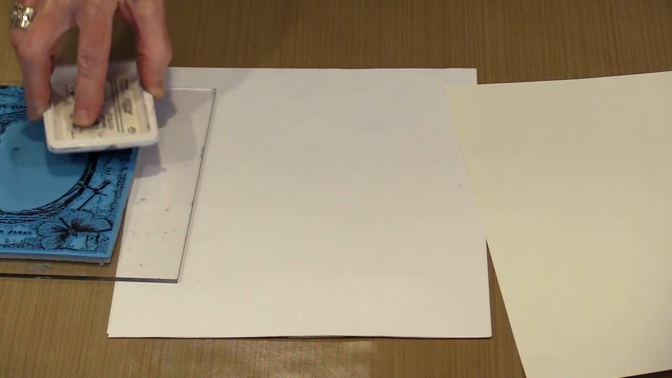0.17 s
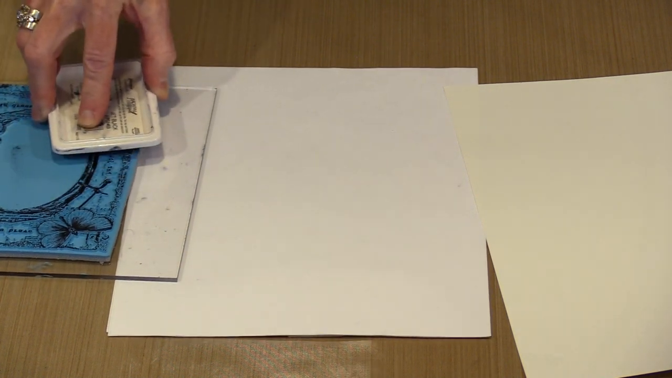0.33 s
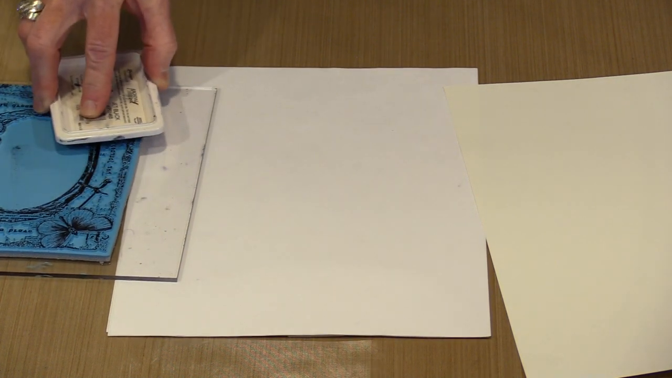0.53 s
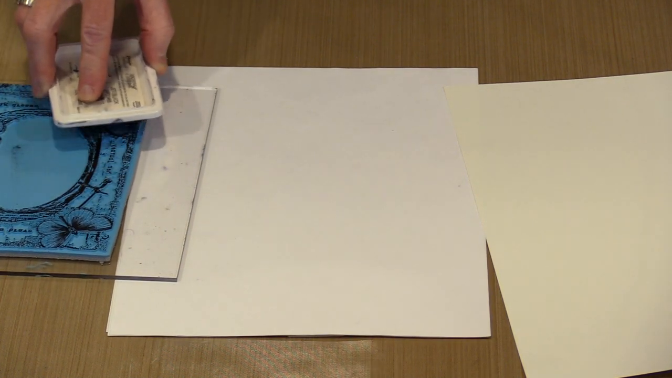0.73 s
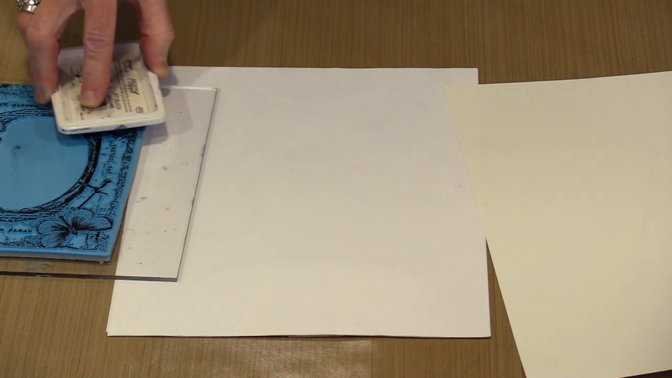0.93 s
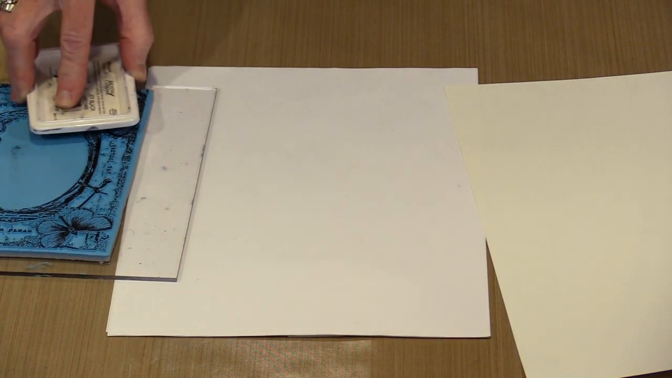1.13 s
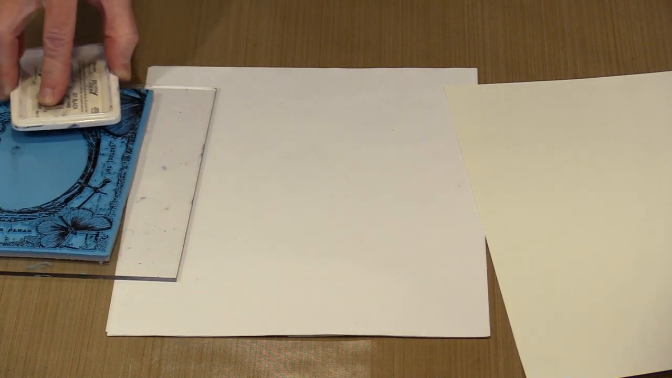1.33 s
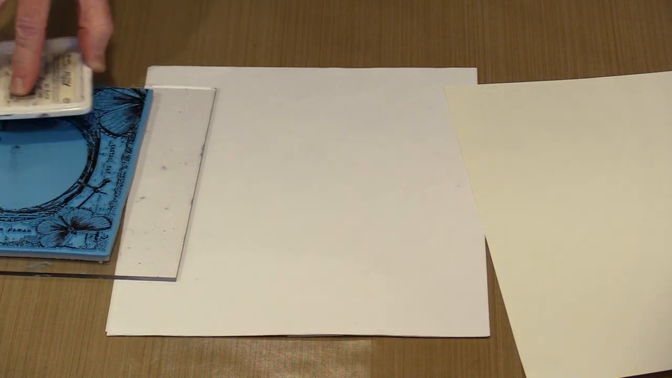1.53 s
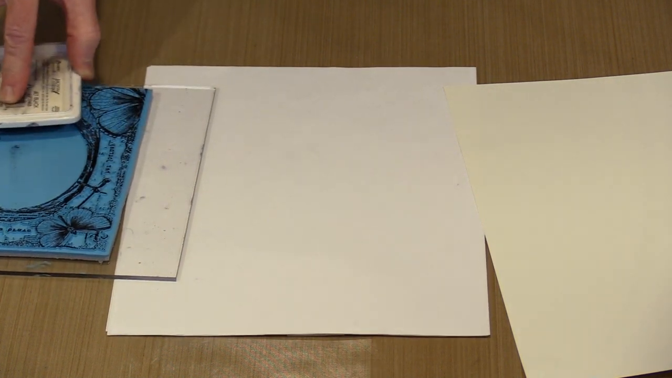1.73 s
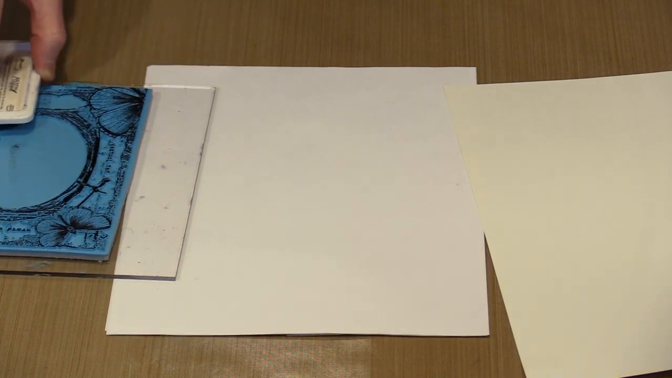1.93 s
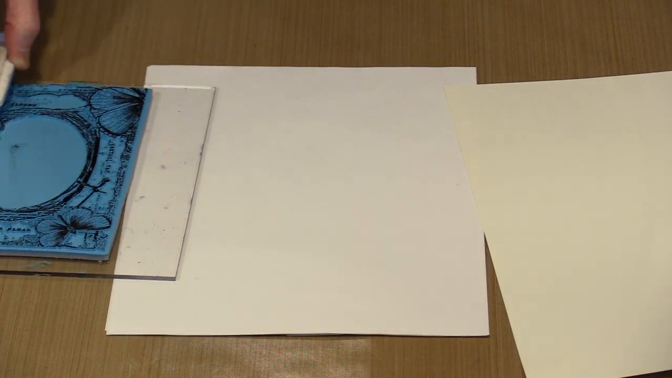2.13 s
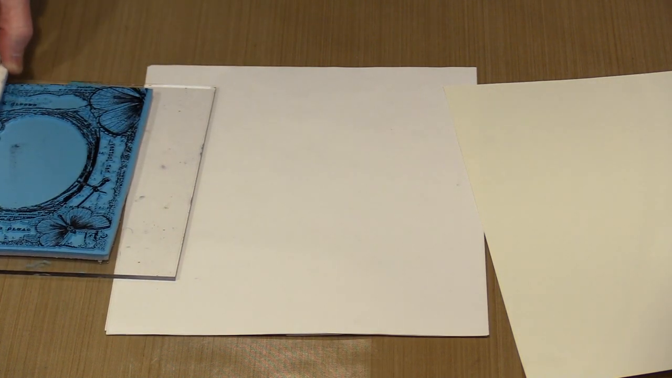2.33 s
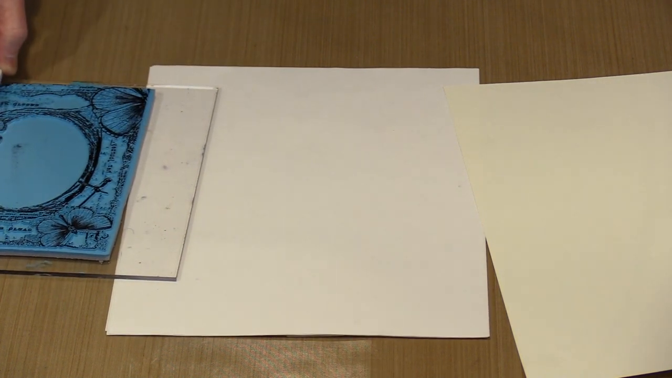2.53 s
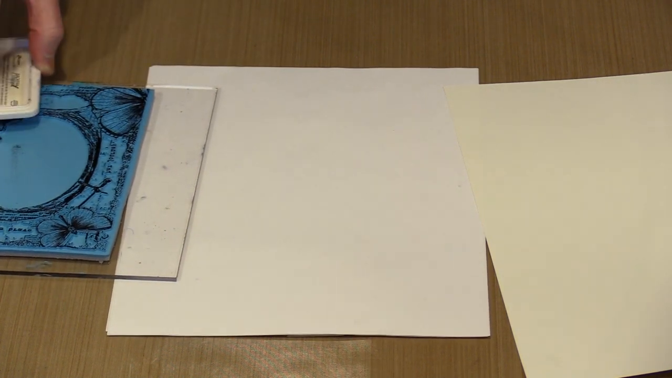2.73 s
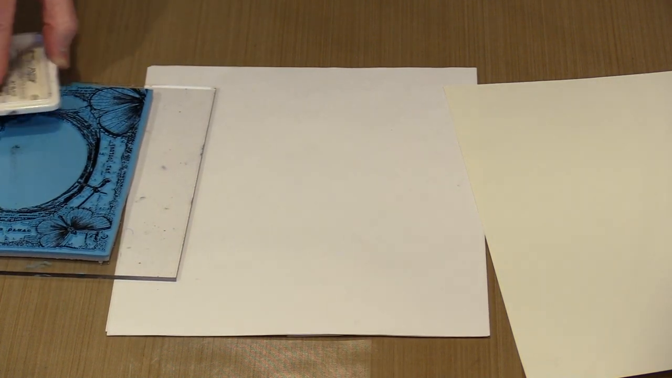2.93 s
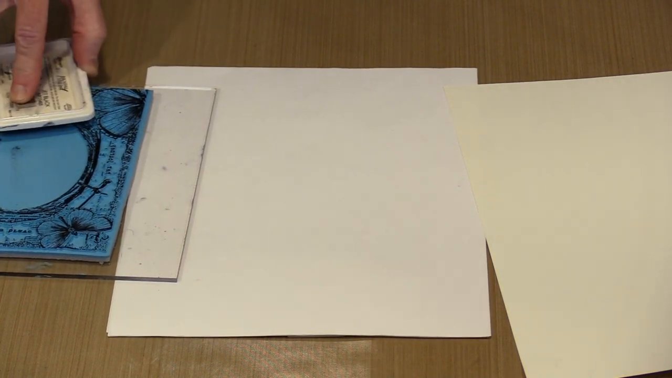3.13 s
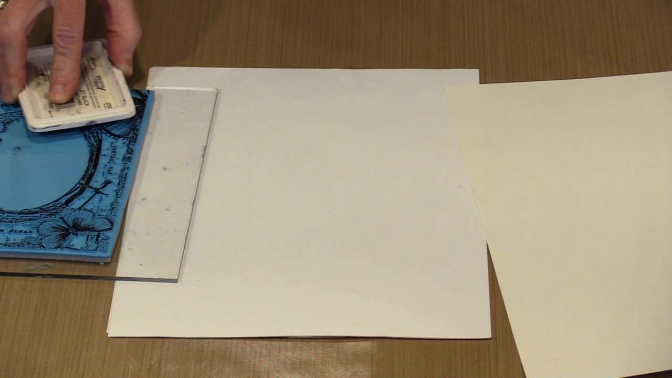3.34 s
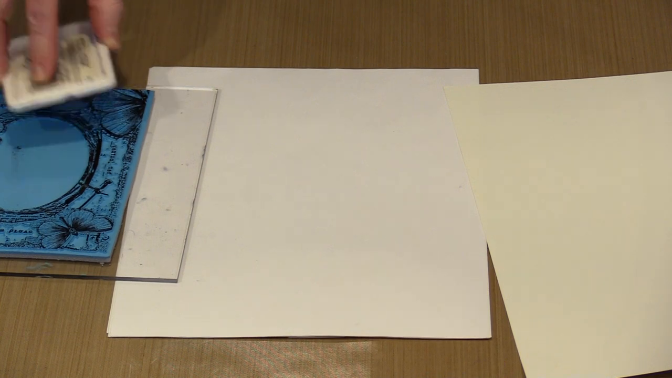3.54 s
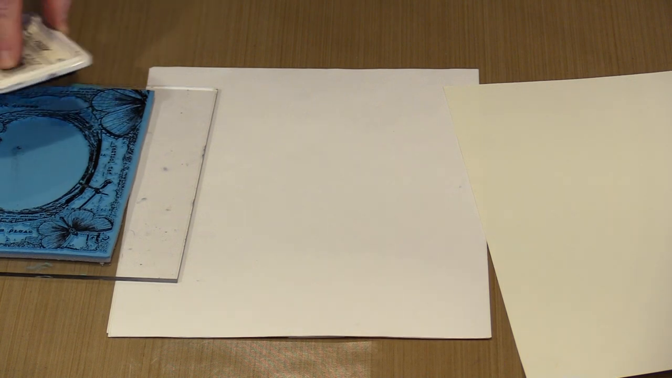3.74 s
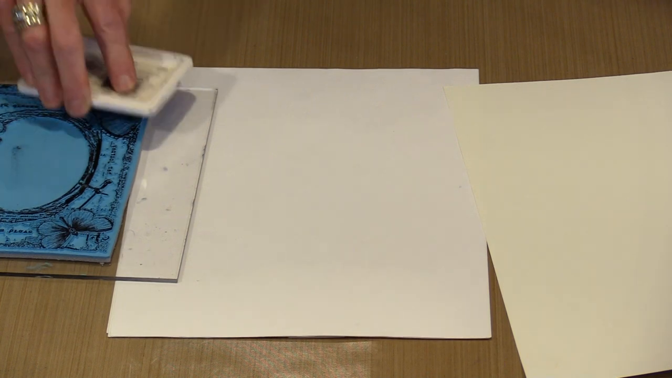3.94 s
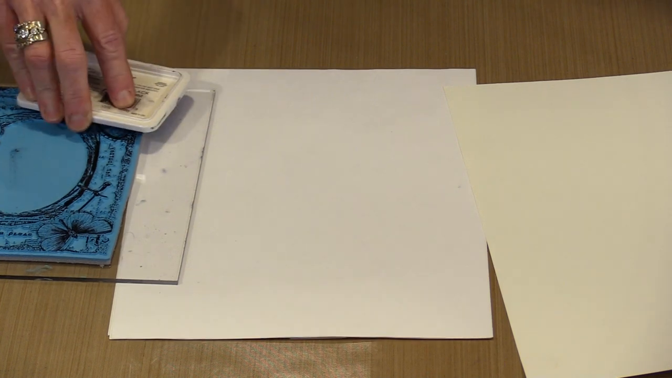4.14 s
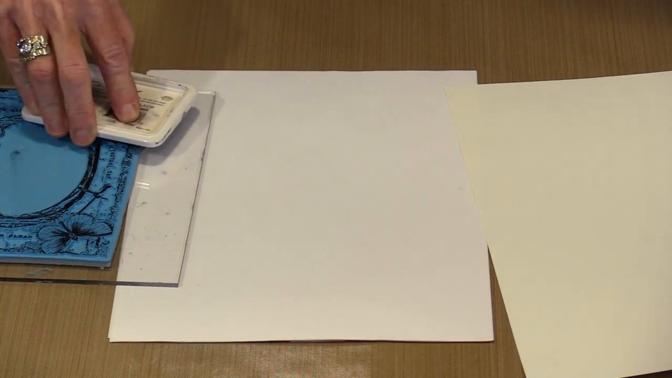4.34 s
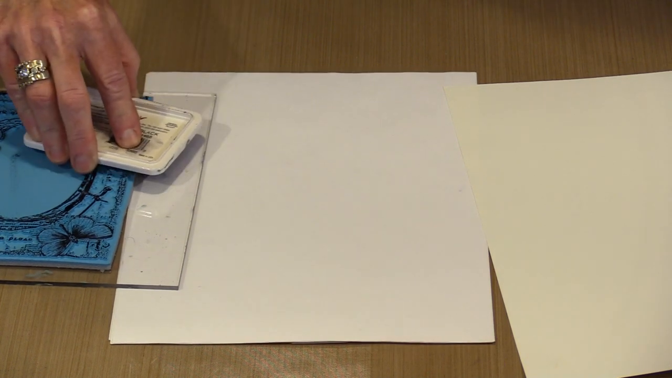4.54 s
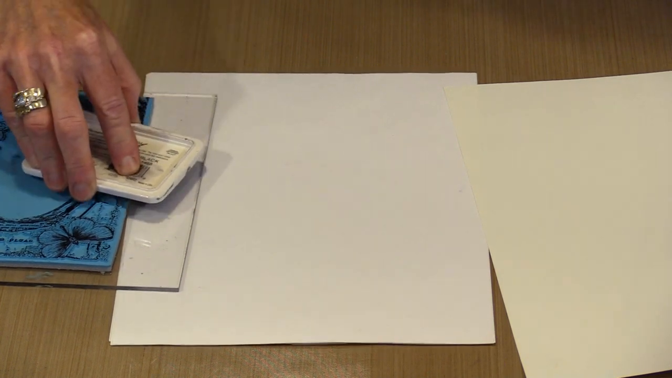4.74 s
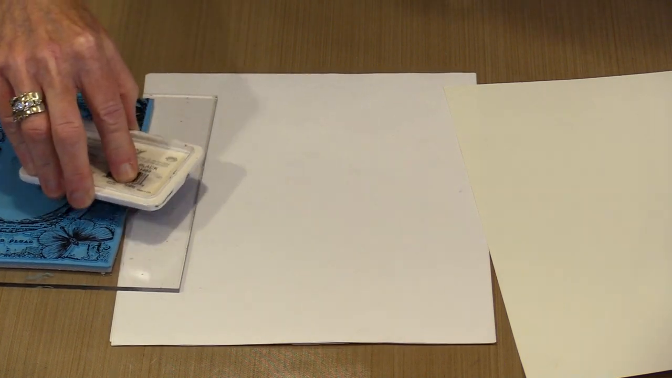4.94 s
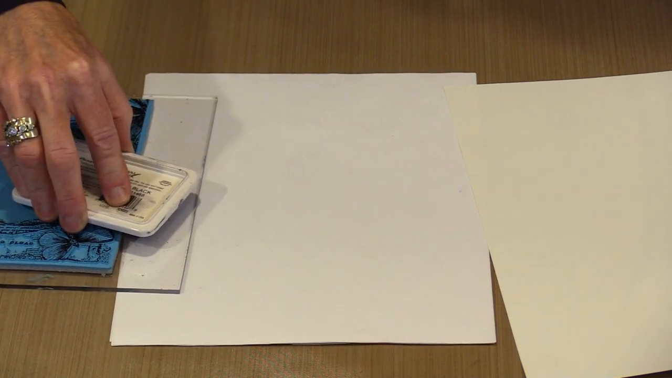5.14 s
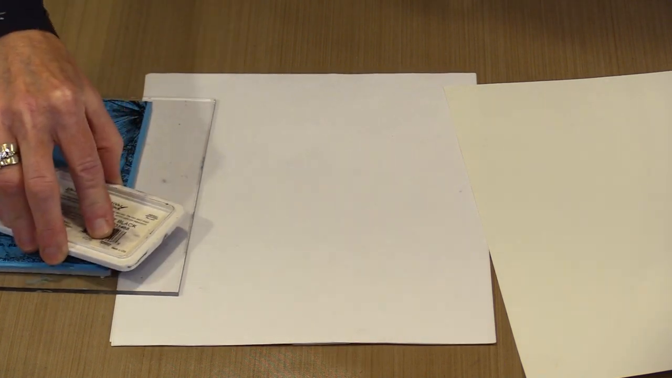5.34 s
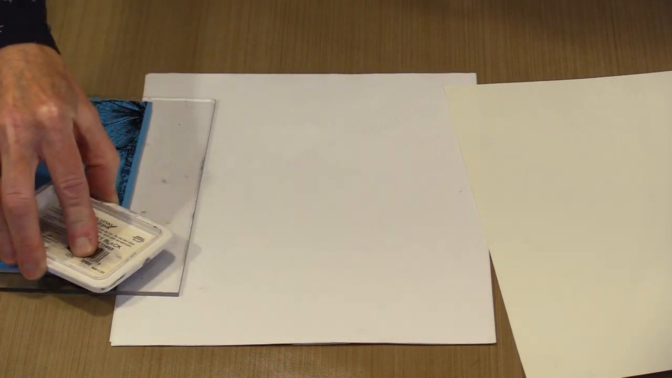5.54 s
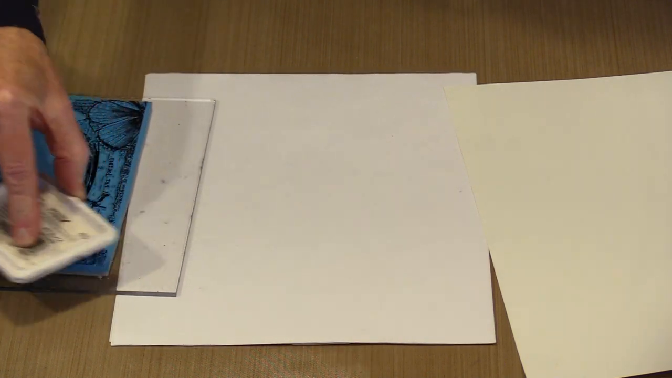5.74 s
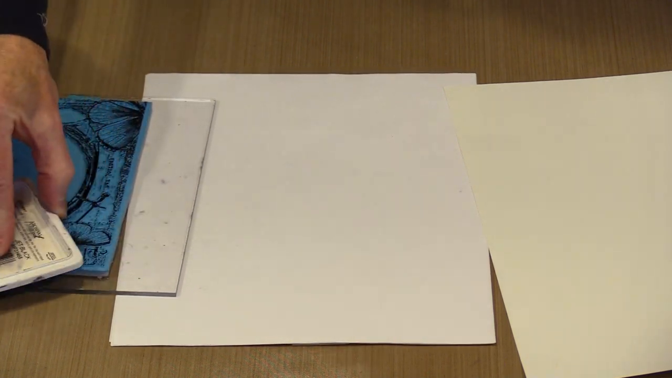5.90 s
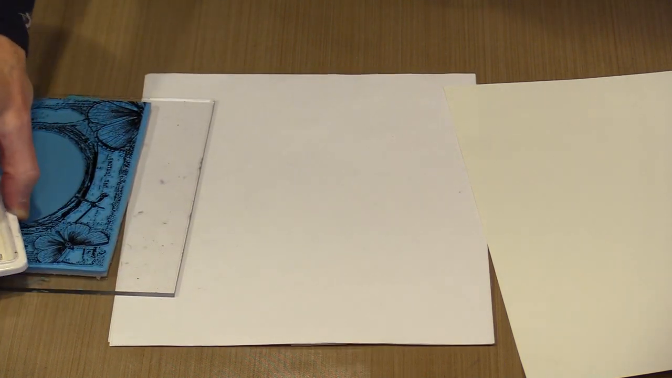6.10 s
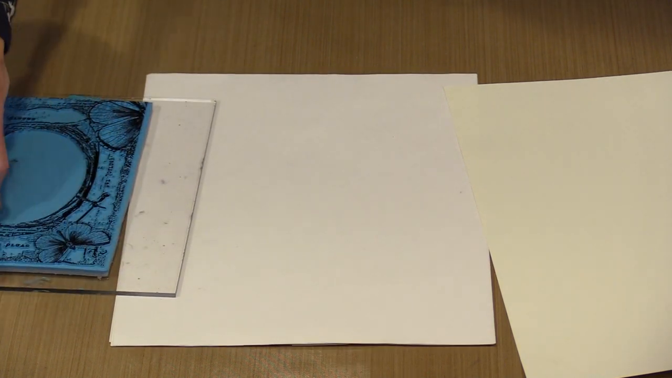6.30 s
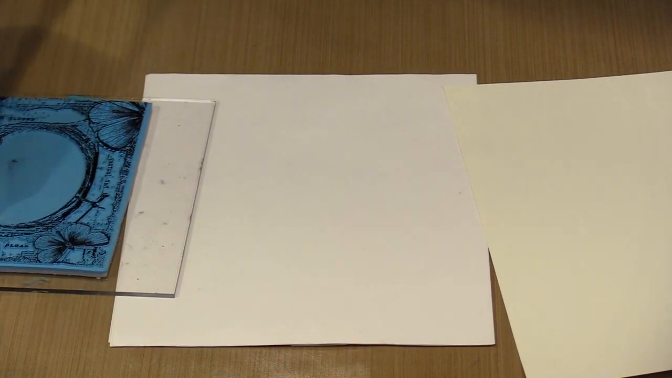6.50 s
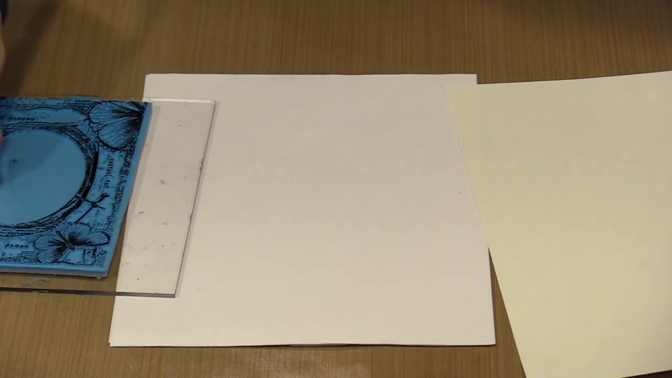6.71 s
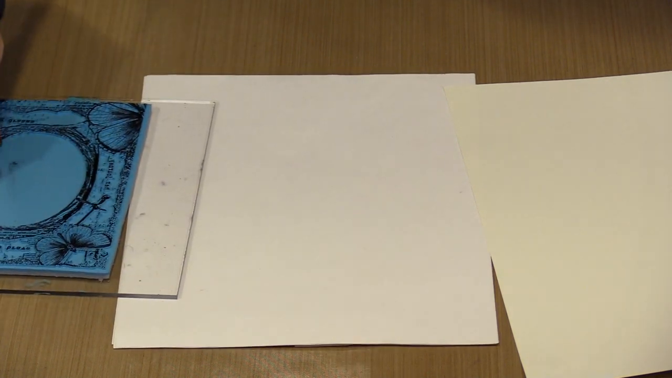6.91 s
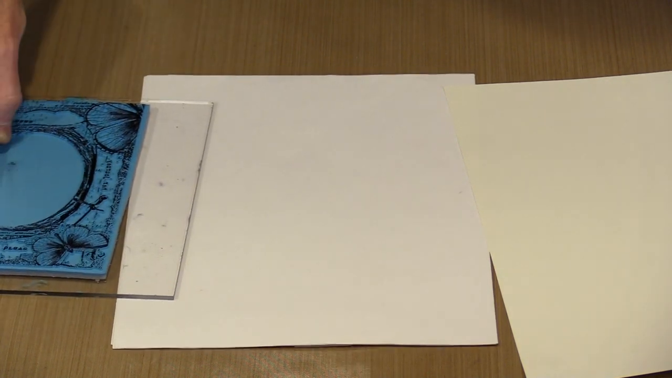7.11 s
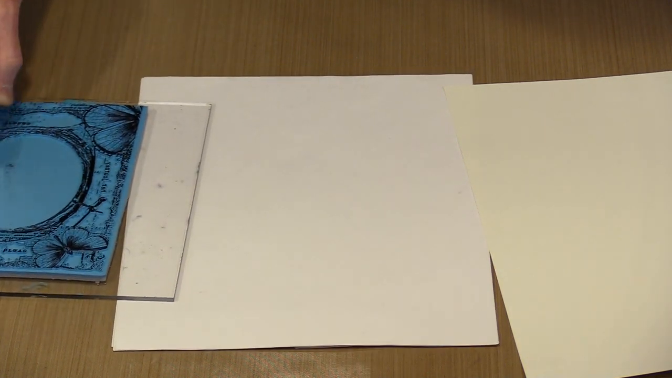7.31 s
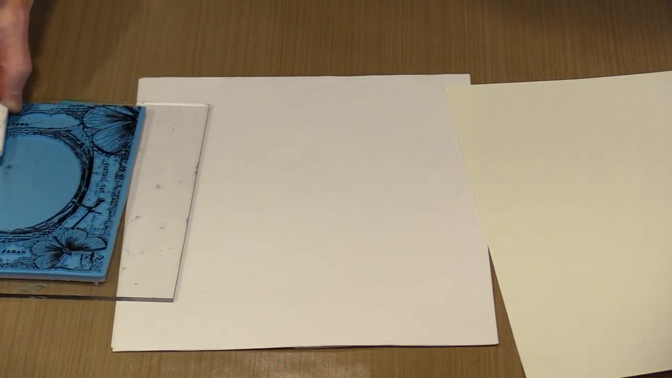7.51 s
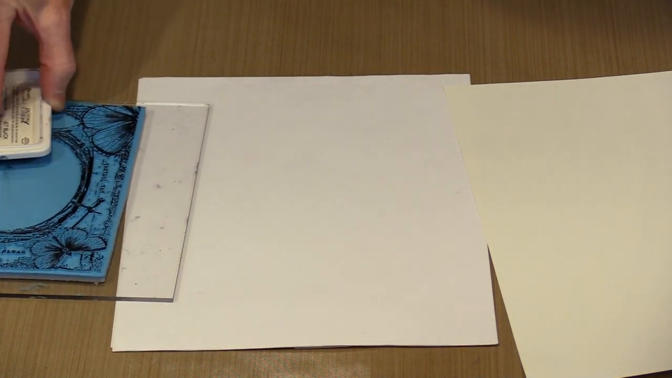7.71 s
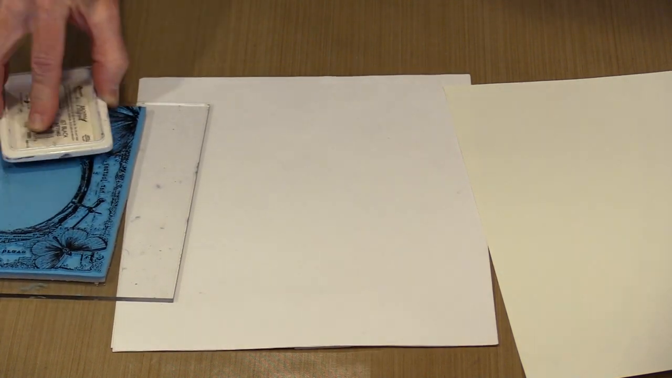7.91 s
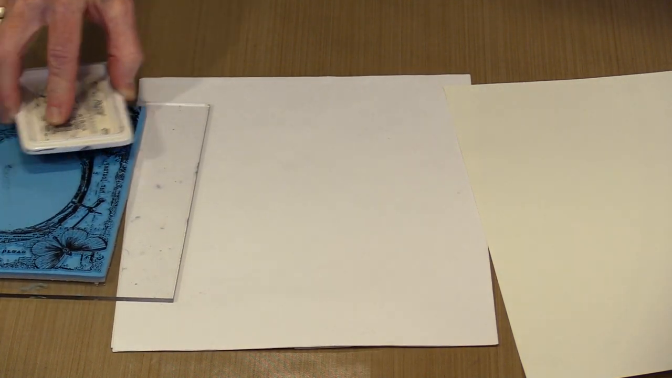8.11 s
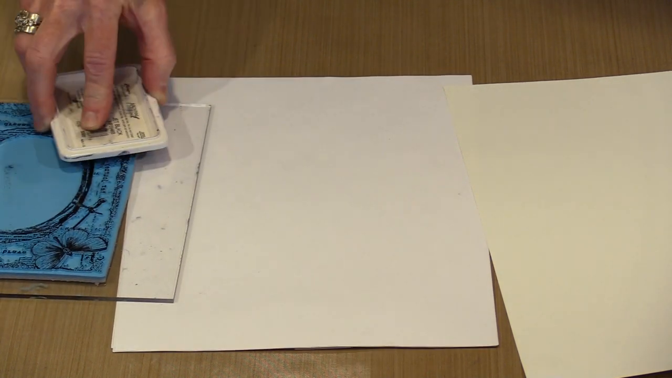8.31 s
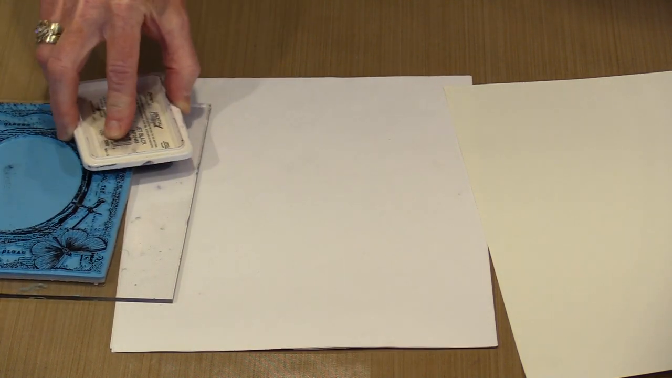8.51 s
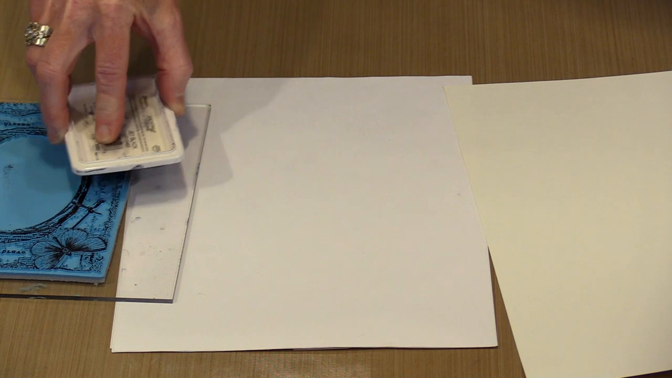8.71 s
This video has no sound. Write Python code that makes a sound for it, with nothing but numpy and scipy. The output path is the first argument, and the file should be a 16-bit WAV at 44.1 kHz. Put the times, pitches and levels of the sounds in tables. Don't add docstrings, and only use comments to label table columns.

```python
import sys
import numpy as np
from scipy import signal
from scipy.fft import rfft, irfft
from scipy.io import wavfile
from scipy.ndimage import uniform_filter1d

SR = 44100
rng = np.random.default_rng(int(sys.argv[2]) if len(sys.argv) > 2 else 0)


def how_loud(loudness_db):
    steps = np.asarray(loudness_db, float) / 20
    return 10 ** steps


def log_audio(samples):
    frames = np.atleast_2d(samples).T
    limited = np.clip(frames, -1, 1)
    pcm = np.round(limited * 32767).astype(np.int16)
    wavfile.write(sys.argv[1], SR, pcm)


N = 386139

# [f/Hz, level per Hz/dB]
AIR = [(18, -59), (30, -10), (109, -9.5), (239, -6.5), (265, -6.5), (987, -10), (1100, -9), (1390, -13),
       (8500, -26), (16000, -37)]
# [f/Hz, width/Hz, level/dB]
FAN = [(122, 40, 5.5), (218, 13, 4), (1115, 105, 3.5), (1695, 13, 6)]
# [f/Hz, correlation]
LIKENESS = [(60, 0.66), (150, 0.73), (380, 0.027), (950, -0.49), (2380, 0.37), (5980, 0.68), (15000, 0.62)]
# [f/Hz, t60/s]
ROOM_DECAY = [(60, 0.6), (350, 0.25), (1000, .3), (2500, 0.29), (6400, 0.21), (14000, 0.059)]
# [f/Hz, level/dB]
ROOM_LEVEL = [(60, -23.5), (250, 0), (500, -15), (1200, -14.5), (3000, -12), (8000, -10)]
# [delay/s, left gain, right gain]
ECHOES = [(.0045, -0.13, 0.4), (.0092, 0.26, 0.084), (0.0145, 0.13, 0.08), (.0165, -0.11, -0.016),
          (.021, 0.038, -0.065)]
# [t/s, level/dB, f/Hz, width/Hz, spread/s]
SNAPS = [(1.868, -23.5, 4850, 920, 0.0023), (1.872, -30.5, 9300, 7750, .002), (1.888, -35, 520, 196, 0.017),
         (1.992, -34.5, 3170, 1500, .002), (2.055, -37, 3180, 910, 0.0031), (2.412, -34, 2930, 1200, .002),
         (3.823, -32, 7300, 5000, 0.0021)]
# [t/s, level/dB, f/Hz, width/Hz, spread/s]
RATTLE = [(6.386, -24, 3000, 1800, 0.015), (2.815, -24, 3200, 2600, 0.02)]
# [t/s, level/dB]
CLACK = [(2.808, -1)]
# [f/Hz, level/dB, t60/s]
CLACK_RING = [(504, -9, 0.17), (612, -2.5, 0.1), (1080, -16.5, 0.49), (1484, 7, 0.035), (1695, 0, 0.24),
              (2235, 2, 0.18), (2350, 13.5, 0.013), (2670, 4.5, 0.052), (3230, 7, 0.025), (3670, -11, 0.11),
              (4200, 7, 0.0039), (4760, 3.5, 0.0089), (7100, -1, 0.012), (9040, -0.5, 0.0095)]
# [t/s, level/dB]
KNOCK = [(2.956, -16.5)]
# [f/Hz, level/dB, t60/s]
KNOCK_RING = [(566, -9.5, 0.21), (715, -14, .03), (830, -5, 0.028), (940, 4.5, 0.038), (1190, -3, .03),
              (1630, -8, 0.017), (2660, -14, 0.02), (3400, -18, .01)]
# [f/Hz, level/dB, t60/s]
TABLE = [(62.5, -2.5, 0.2), (84.3, 3.5, 0.15)]
# [f/Hz, level/dB, t60/s]
BOARD = [(168.5, 1, 0.12), (222.6, -3, 0.12), (146, -14.5, 0.14)]
# [f/Hz, level/dB, t60/s]
PANEL = [(294.5, 4.5, 0.056), (324.5, -1, 0.24), (364, 1.5, 0.25), (415, 3, 0.094), (470, -10, 0.19),
         (562, 1, 0.085), (614, -1.5, 0.097), (715, -6.5, 0.07)]
# [f/Hz, level/dB]
LID = [(680, -6.5), (800, 2), (960, -3)]
# [f/Hz, level/dB]
WALL = [(1150, -20), (1270, 7), (1420, 8.5), (1560, 2.5), (1850, 1)]
# [f/Hz, level/dB]
EDGE = [(2120, 8.5), (2520, 10.5), (2900, 7.5), (3250, 9.5), (3800, 6.5), (4500, 3), (5300, -6),
        (6500, -19), (8500, -36)]
# [t/s, weight/dB, board/dB]
WEIGHT = [(0, -31.5, 7.5), (.45, -26.5, -10), (1.101, -29, 0.5), (1.6, -29, -1.5), (2.4, -40, 4.5),
          (3.052, -28, -4.5), (3.998, -25.5, 0.5), (4.8, -29, -0.5), (5.3, -26.5, 4), (5.601, -33.5, 1.5),
          (6.13, -27.5, 5), (6.401, -33, 8.5), (6.77, -34.5, -7), (7.552, -28, 8.5), (8.1, -31.5, -4),
          (8.6, -26, 3.5)]
# [t/s, slab pop level/dB, pop f/Hz, case slap level/dB, edge-first tilt/dB]
DABS = [(0.012, -7, 520, -23, -17), (0.278, -2.5, 515, -12, -13), (0.566, -9, 415, -11, -19),
        (0.842, -8, 434, -16.5, -15), (1.097, -11, 496, -23, -8.5), (1.367, -19, 500, -25.5, -3.5),
        (1.643, -14.5, 490, -21, -4), (1.93, -22, 500, -27.5, -2.5), (2.229, -25.5, 493, -35, -3),
        (2.484, -31, 480, -34, -9.5), (2.78, -20.5, 520, -30, -6.5), (3.061, -22.5, 460, -28.5, 0.7),
        (3.348, -11, 488, -21.5, -7),
        (4.018, -4, 450, -15.5, -9), (4.273, -10.5, 476, -27.5, -10), (4.524, -13, 468, -24.5, -11),
                (4.785, -19, 424, -24, -12.5), (5.054, -14.5, 466, -20.5, -13),
                (5.332, -13, 470, -21.5, -10), (5.578, -24, 334, -32, -6), (5.876, -14.5, 472, -34, -5.5),
                (6.132, -12, 500, -22.5, -14), (6.382, -12, 535, -17, -2.5), (6.769, -5.5, 472, -19.5, -11),
                (7.108, -8.5, 506, -28.5, -16), (7.412, -5.5, 510, -19, -5),
                (7.692, -21.5, 348, -21.5, -2.1), (7.96, -11, 504, -25, -3), (8.226, -20, 440, -33, -8.5),
                (8.549, -10.5, 438, -23, -15.5)]


def evened(x):
    return x / np.sqrt(np.mean(x ** 2) + 1e-20)


def peaked(x):
    return x / (abs(x).max() + 1e-20)


def read(points, hz):
    f, value = np.transpose(points)
    return np.interp(np.log(hz + 1), np.log(f + 1), value)


def add(mix, s, sound):
    part = mix[round(s * SR):][:len(sound)]
    part += sound[:len(part)]


def floor():
    frames, hz = N // 512 + 5, np.fft.rfftfreq(2048, 1 / SR)
    a, b, c, d, patches = rng.standard_normal((frames, 1025, 5)).T
    patches = evened(uniform_filter1d(uniform_filter1d(patches, 24, 0), 8, 1))
    same = np.clip(read(LIKENESS, hz), -1, 1)[:, None]
    left = a + 1j * b
    right = same * left + np.sqrt(1 - same ** 2) * (c + 1j * d)
    fan = sum(how_loud(db) / (1 + (2 * (hz - f) / width) ** 2) for f, width, db in FAN)
    colour = (how_loud(read(AIR, hz)) * (1 + fan))[:, None]
    z = np.array([left, right]) * colour * how_loud(1.1 * patches)
    return how_loud(-44.0) * evened(signal.istft(z, nperseg=2048, noverlap=1536)[1][:, :N])


def all_round(sound, blur):
    total = np.cumsum(abs(rfft(sound, 16384)) ** 2)
    k = np.arange(len(total))
    low = k * (1 - blur)
    high = np.minimum(k * (1 + blur) + 1, k[-1])
    power = (np.interp(high, k, total) - np.interp(low, k, total)) / (high - low + 1e-9)
    return np.roll(irfft(np.sqrt(power)), 200)[:1200] * signal.windows.tukey(1200, 0.3)


def room(near, spread):
    taps = np.zeros((2, SR // 2))
    starts = np.arange(400, SR // 2 - 20, 20)
    at = starts + rng.integers(0, 20, (2, len(starts)))
    np.put_along_axis(taps, at, rng.choice([-1., 1.], at.shape), 1)
    hz, t, z = signal.stft(taps, SR, nperseg=256)
    alike = np.clip(1.2 - hz / 1500, 0, 1)[:, None]
    z[1] = alike * z[0] + np.sqrt(1 - alike ** 2) * z[1]
    fade = how_loud(-60 * t / read(ROOM_DECAY, hz)[:, None])
    fade = fade / np.sqrt((fade ** 2).sum(1, keepdims=True)) * how_loud(read(ROOM_LEVEL, hz))[:, None]
    tail = signal.istft(z * fade, SR, nperseg=256)[1] * how_loud(0.5)
    tail[:, :300] = 0
    early = np.zeros((2, 2000))
    early[:, 0] = 1
    for s, left, right in ECHOES:
        early[:, round(s * SR)] += left, right
    return (signal.fftconvolve(near[None], early, axes=1)[:, :N]
            + signal.fftconvolve(spread[None], tail, axes=1)[:, :N])


def resonate(x, hz, width):
    turn = np.exp(2j * np.pi * hz * np.arange(x.shape[-1]) / SR)
    r = np.exp(-np.pi * width / SR)
    return 2 * (turn * signal.lfilter([1 - r], [1, -r], x / turn)).real


def snap(hz, width, spread_s):
    t = np.arange(2000) / SR
    burst = rng.standard_normal(2000) * np.exp(-t / spread_s) * (1 - np.exp(-t / 0.00025))
    return peaked(resonate(resonate(burst, hz, width), hz, width))


def ring(modes, t, detune, uneven_db):
    hz, db, t60 = np.transpose(modes)[:, :, None]
    a, b = rng.standard_normal((2, len(modes), 1))
    level = how_loud(db + uneven_db * b - 60 * t / t60)
    return (level * np.sin(2 * np.pi * hz * (1 + detune * a) * t)).sum(0)


def landing(spread_s, rise_s):
    t = np.arange(1024) / SR
    shape = (1 - np.exp(-t / rise_s)) * np.exp(-t / spread_s)
    contacts = rng.standard_normal(1024) ** 3 * shape
    for _ in range(3):
        z = rfft(contacts, 2048)
        contacts = irfft(z / (abs(z) + 1e-12))[:1024] * shape ** 0.093
    return np.convolve(contacts, np.hanning(6))


def knock(modes):
    t = np.arange(12000) / SR
    rings = signal.fftconvolve(ring(modes, t, 0.0025, 0.083), landing(0.0034, 0.00038))[:12000]
    return peaked(signal.sosfilt(signal.butter(3, 400, "high", fs=SR, output="sos"), rings))


def stir(modes, lag_s, rise_s, detune, uneven_db):
    t = np.maximum(np.arange(9000) / SR - lag_s, 0)
    return ring(modes, t, detune, uneven_db) * (1 - np.exp(-(t / rise_s) ** 2))


def thud(panel_db, top_db, board_db):
    top = -how_loud(top_db + 7.0) * stir(TABLE, 0.0021, 0.0044, 0.021, 0.38)
    board = how_loud(board_db + 4.5) * stir(BOARD, 0.0003, 0.0022, 0.062, 1.55)
    panel = how_loud(panel_db - 24.0) * stir(PANEL, 0.0025, 0.0049, 0.037, 2.0)
    return top + board, panel


def damped(modes, t60, spread_s, rise_s):
    t = np.arange(2000) / SR
    rings = ring([(hz, db, t60) for hz, db in modes], t, 0.03, 1.5)
    return evened(signal.fftconvolve(rings, landing(spread_s, rise_s))[:2000])


def dab(pop_db, pop_hz, lid_db, wall_db, tick_db):
    t = np.arange(2000) / SR
    swell = t ** 2.03 * np.exp(-(t / 0.0057) ** 2)
    pop = np.sin(2 * np.pi * pop_hz * (t - 0.0046)) * peaked(swell)
    lid = damped(LID, 0.024, 0.0037, 0.0019)
    wall = damped(WALL, 0.024, 0.0068, 0.00041)
    tick = damped(EDGE, 0.011, 0.0045, 0.0013)
    return (how_loud(pop_db - 3.0) * pop + how_loud(lid_db - 11.0) * lid
            + how_loud(wall_db - 10.5) * wall + how_loud(tick_db - 5.5) * tick)


def strengths(s, pop_db, pop_hz, case_db, tilt_db):
    lean = tilt_db + 7
    grip_db = 2.3 if s > 3.7 else -0.17
    lid = grip_db - 0.05 * lean
    when, weight, board = np.transpose(WEIGHT)
    weight_db = np.interp(s, when, weight)
    board_db = weight_db + np.interp(s, when, board) + 2.6 + 0.34 * lean
    panel_db = pop_db + 3.5 - 25.5 * np.log2(pop_hz / 470)
    panel_db -= 0.23 * (pop_db - case_db - 13.5)
    slap = (pop_db, pop_hz, case_db + lid, case_db - lid, case_db + tilt_db)
    return slap, (panel_db, weight_db, board_db)


def scene():
    near, spread, wood, panel = np.zeros((4, N))
    sounds = [(s, how_loud(db) * snap(*shape)) for s, db, *shape in SNAPS + RATTLE]
    sounds += [(s, how_loud(db) * knock(CLACK_RING)) for s, db in CLACK]
    sounds += [(s, how_loud(db) * knock(KNOCK_RING)) for s, db in KNOCK]
    for row in DABS:
        slap, blow = strengths(*row)
        sounds.append((row[0] - 0.0008, dab(*slap)))
        heavy, thin = thud(*blow)
        add(wood, row[0], heavy)
        add(panel, row[0], thin)
    for s, sound in sounds:
        add(near, s, sound)
        add(spread, s, all_round(sound, 0.11))
    side = np.array([[-1], [1]])
    table = wood * how_loud(side * 0.78) + panel * how_loud(side * 2.8)
    return room(near, spread) + table + floor()


def roll_off(x):
    return signal.sosfilt(signal.butter(12, 16120, fs=SR, output="sos"), x)


def record(dry):
    cut = signal.sosfilt(signal.butter(5, 42, "high", fs=SR, output="sos"), dry)
    band_limit = signal.firwin(511, 15790, window=("kaiser", 9), fs=SR)
    cut = signal.oaconvolve(cut, band_limit[None], "same")
    return roll_off(np.clip(cut, -1, 1))


dry = scene()
out = record(dry)
log_audio(out)
```